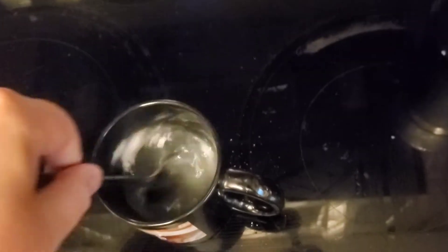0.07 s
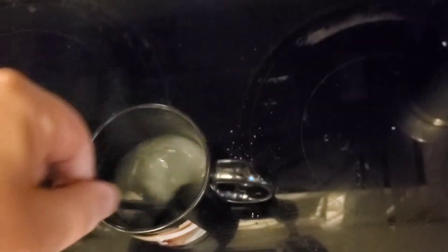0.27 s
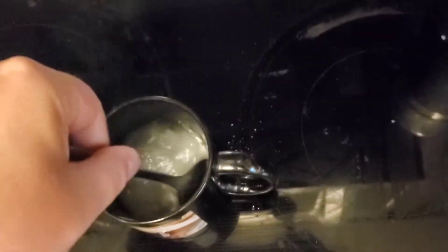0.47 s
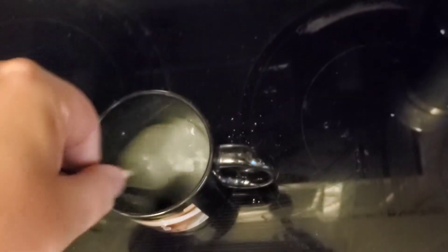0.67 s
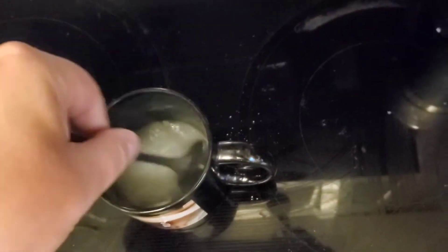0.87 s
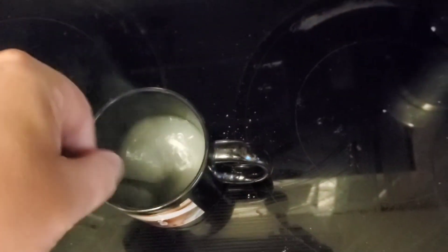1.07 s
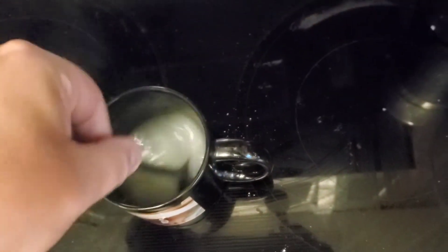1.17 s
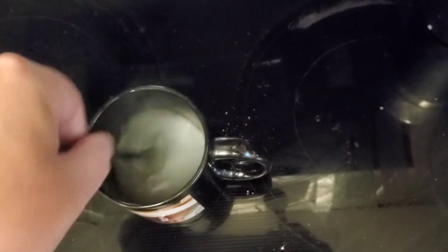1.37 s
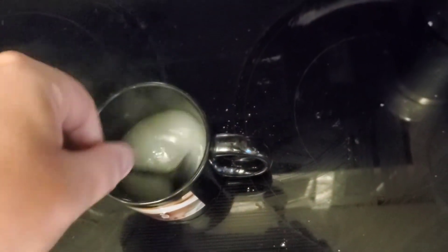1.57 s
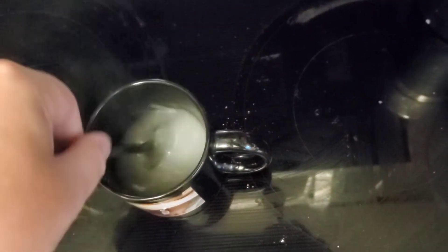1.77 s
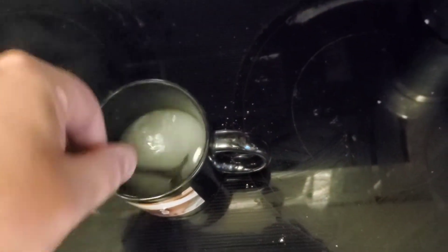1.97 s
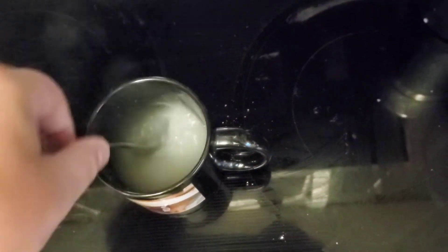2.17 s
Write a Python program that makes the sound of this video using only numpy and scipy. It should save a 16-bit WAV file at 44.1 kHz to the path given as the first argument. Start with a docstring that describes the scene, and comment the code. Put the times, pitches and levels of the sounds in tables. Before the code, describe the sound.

Close up in a small kitchen, a spoon stirs a drink in a mug on a glass hob. Each turn brings a short ringing clink and a duller knock, with light swishing and fizzing in between and quick echoes.

```python
"""A knock and a bright chink, then steady clinking: a metal spoon stirs powder into water in a mug.
On each turn, about two and a half a second, it hits the wall, which rings, then knocks low in
the mug, which shakes the glass hob below. Water swishes and fizzes between the blows.
A small kitchen answers the blows with quick echoes, over a faint rumble."""
import sys
import numpy as np
from scipy import signal
from scipy.fft import rfft, irfft, next_fast_len
from scipy.io import wavfile
from scipy.ndimage import map_coordinates

SR = 44100
rng = np.random.default_rng(int(sys.argv[2]) if len(sys.argv) > 2 else 0)


def unload_audio(sound):
    """Save the sound as a 16-bit wav file, at the path given as the first command line argument."""
    columns = np.transpose(np.atleast_2d(sound))
    # keep every value between -1 and 1, then stretch to whole-number steps
    steps = np.round(np.clip(columns, -1, 1) * 32767)
    wavfile.write(sys.argv[1], SR, steps.astype(np.int16))


N = 97284
T = np.arange(N) / SR
CONTACT_RISE_S, WAVERS_PER_S = .00049, 42.9


def from_db(db):
    return 10 ** (np.asarray(db) / 20)


def unit_rms(x):
    return x / np.sqrt(np.mean(x ** 2) + 1e-20)


def at_hz(points, hz):
    """Read a table between its frequencies."""
    freqs, values = np.transpose(points)
    return np.interp(np.log(hz + 1e-9), np.log(freqs), values)


def pan(db):
    """Left and right gains with the same total power."""
    gains = from_db(np.array([np.atleast_1d(db), -np.atleast_1d(db)]) / 2)
    return gains / np.sqrt(np.mean(gains ** 2, axis=0))


def fade(t60):
    """Die away by 60 dB in t60 seconds, the ring time."""
    return np.exp(-np.log(1000) * T / t60)


def rise(seconds):
    return 1 - np.exp(-T / seconds)


def add(out, start_s, x):
    i = max(int(start_s * SR), 0)
    out[:, i:] += x[..., :N - i]


def waver(t):
    """A random curve wandering by about 1 either way."""
    return map_coordinates(rng.standard_normal(200), [t * WAVERS_PER_S], order=1, mode="nearest")


# How alike left and right are: (frequency [Hz], likeness [0 to 1])
LIKENESS = [(130, .99), (300, .95), (600, .8), (1300, .4), (2500, .15), (6000, .1), (16000, 0)]
# How much louder the left is: (frequency [Hz], level [dB])
BALANCE = [(100, .8), (600, 1.2), (1400, -2.5), (2100, -6.8), (3200, -3), (4500, -1.2), (9000, -2.3),
           (14000, -4.8)]
def noise(spectrum, ripple_db=0, size=N):
    """Shaped stereo noise about size samples long; ripple adds random peaks and dips."""
    size = next_fast_len(size, True)
    hz = np.arange(size // 2 + 1) * SR / size
    mid, side = rfft(rng.standard_normal((2, size)))
    ripple = ripple_db * np.interp(hz / 130, np.arange(256), rng.standard_normal(256))
    alike = at_hz(LIKENESS, hz)
    stereo = np.sqrt(1 + alike) * mid + np.sqrt(1 - alike) * side * [[1], [-1]]
    shaped = stereo * from_db(at_hz(spectrum, hz) + ripple) * pan(at_hz(BALANCE, hz))
    x = unit_rms(irfft(shaped, size)[:, :N])
    return np.pad(x, [(0, 0), (0, N - x.shape[1])])


def ring(tones, size=26000, wobble_hz=16.2, scatter_db=3, flutter_db=2.5):
    """One blow starts fading tones; sloshing water makes them waver."""
    out, t = np.zeros((2, N)), T[:size]
    for k, (hz, db, t60) in enumerate(tones):
        apart = np.arccos(at_hz(LIKENESS, hz)) / 2 * (-1) ** k  # high tones reach the ears out of step
        slosh = waver(t)
        pitch = hz + wobble_hz * min(hz / MUG_HZ[0], 1) * slosh
        phase = rng.uniform(0, 2 * np.pi) + 2 * np.pi * np.cumsum(pitch) / SR
        level = db + scatter_db * rng.normal() + flutter_db * slosh * np.minimum(t * WAVERS_PER_S, 1)
        gain = from_db(level) * np.exp(-np.log(1000) * t / t60)
        out[:, :size] += gain * pan(at_hz(BALANCE, hz)) * np.sin(phase + apart * np.array([[1], [-1]]))
    return out


# Background noise: (frequency [Hz], relative level [dB])
RUMBLE = [(25, -59), (45, 9), (70, 4), (140, 3), (300, 3), (1000, -22), (4000, -44), (16000, -25)]
def rumble():
    """A faint, steady rumble with a little hiss."""
    return from_db(-58.5) * noise(RUMBLE)


# The room's lingering sound: (frequency [Hz], relative level [dB])
ROOM_TAIL = [(100, -2), (400, -2.5), (1500, -3), (3000, -3), (6000, 2.5), (10000, 9.5), (16000, 2.5)]
# Echoes off near surfaces: (delay [s], level [dB])
ECHOES = [(.0092, -16.5), (0.0196, -19)]
def kitchen(x, tail_db=-13.5, tail_delay_s=.012):
    """Two quick echoes and a short blurred tail whose treble dies first."""
    blur = noise(ROOM_TAIL)
    low = signal.sosfilt(signal.butter(1, 4000, fs=SR, output="sos"), blur)
    tail = low * fade(t60=.46) + (blur - low) * fade(t60=.12)
    out = x.copy()
    add(out, tail_delay_s, signal.fftconvolve(x, from_db(tail_db) * unit_rms(tail) / np.sqrt(N), axes=1))
    for delay_s, db in ECHOES:
        add(out, delay_s, from_db(db) * x)
    return out


# The scrape's hiss: (distance from its pitch [Hz], relative level [dB])
SCRAPE_BAND = [(20, 0), (180, -2), (450, -14), (1200, -32), (5000, -60)]
def scrape(lead_s=.075, width_s=.03, pitch_hz=4600, climb_hz_per_s=7000):
    """Before each clink the spoon slides along the wall: a faint, rising hiss."""
    glides = np.zeros(N)
    for clink_s, *_ in CLINKS:
        t = T - clink_s + lead_s
        swell = np.exp(-(t / width_s) ** 2)
        glides += swell * np.sin(2 * np.pi * (pitch_hz + climb_hz_per_s * t / 2) * t)
    return from_db(-70) * glides * noise(SCRAPE_BAND)


def fizz(pitches=18, bubbles_per_s=440, ring_cycles=7.3):
    """Small bubbles appear at random, each ringing for a few cycles."""
    out = np.zeros((2, N))
    for hz in np.geomspace(950, 2000, pitches):
        born = rng.random(N) < bubbles_per_s / pitches / SR
        clicks = born * from_db(10 * np.minimum(rng.exponential(1, N), 3))
        decay = np.exp(-np.log(1000) * hz / ring_cycles / SR)
        step = 2 * np.pi * hz / SR
        pings = signal.lfilter([0, np.sin(step)], [1, -2 * decay * np.cos(step), decay ** 2], clicks + 1e-18)
        out += pan(rng.normal(-1.3, 8.6)) * pings
    return unit_rms(out)


# The swish's noise: (distance from its pitch [Hz], relative level [dB])
SWISH_BAND = [(20, 0), (110, -2), (260, -14), (700, -34), (3000, -60)]
def swish(pitch_hz=1386, swing_hz=159.1, turns_per_s=2.4, highest_at_s=.93):
    """The hollow behind the spoon sings, gliding up and down once a turn."""
    hz = pitch_hz + swing_hz * np.cos(2 * np.pi * turns_per_s * (T - highest_at_s))
    band = noise(SWISH_BAND) * np.sin(2 * np.pi * np.cumsum(hz) / SR)
    return pan(at_hz(BALANCE, pitch_hz)) * unit_rms(band)


# How the water swells and sinks: (time [s], level [dB])
SWIRL = [(0, -39.5), (.3, -69), (.44, -45.5), (.56, -45), (.62, -44), (.77, -75), (.86, -39.5), (.95, -50),
         (1.04, -47.5), (1.16, -66), (1.3, -45.5), (1.41, -45), (1.58, -58), (1.72, -47), (1.84, -45.5),
         (1.98, -67), (2.2, -37.5)]
# The water's broad wash: (frequency [Hz], relative level [dB])
WASH = [(60, -19), (140, -15), (250, -21), (500, -7.5), (800, -14.5), (1150, -3.5), (1450, 3),
        (1900, -13.5), (3000, -7.5), (3900, -25), (4700, -7.5), (6500, -25), (9000, -24.5), (16000, -34)]
def water(plop_s=.524):
    """Water pushed by the spoon washes, swishes and fizzes; one larger bubble bursts."""
    bubbles = from_db(-9) * fizz()
    swell = from_db(np.interp(T, *np.transpose(SWIRL)) + .5 * waver(T))
    out = swell * (from_db(-2) * noise(WASH) + from_db(-6.5) * swish() + bubbles)
    plop = ring([(hz, -24.5, .035) for hz in (1167, 1350, 1600)])
    add(out, plop_s, plop * rise(CONTACT_RISE_S))
    return out


# The spoon dragging on the mug's bottom: (frequency [Hz], relative level [dB])
SCUFF = [(50, -15), (140, -0.5), (230, -9), (460, -1), (750, -14), (1500, -14), (5000, -47), (16000, -62)]
# Soft bumps: (time [s], boom level [dB], scuff level [dB])
BUMPS = [(.004, -22, -30.5), (.137, -25.5, -23), (0.196, -45, -28.5), (0.246, -36, -36.5),
         (0.297, -30, -37.5), (0.632, -35, -39), (0.723, -27.5, -44.5), (1.077, -32, -35.5),
         (1.112, -32, -40.5), (1.46, -32, -48), (1.517, -31.5, -37), (1.878, -32.5, -35.5),
         (1.923, -36, -43)]
def bumps(boom_hz=142.3, scatter_hz=6.9):
    """The mug bumps the hob with a boom; with each, the dragging spoon makes a soft, low scuff."""
    out = np.zeros((2, N))
    for start_s, boom_db, scuff_db in BUMPS:
        hz = boom_hz + scatter_hz * rng.normal()
        boom = from_db(boom_db) * np.sin(2 * np.pi * hz * T) * fade(t60=.19)
        scuff = from_db(scuff_db) * noise(SCUFF, size=12000) * fade(t60=.13)
        add(out, start_s, (boom + scuff) * rise(.0045))
    return out


# Crowds of brief tones in mug, metal and hob, each: (frequency [Hz], relative level [dB])
MUG_CLACK = [(100, -25.5), (700, -21.5), (1200, -4.5), (1700, -5.5), (2300, 1.5), (3200, 1), (4100, -8),
             (5200, -3), (7000, -22.5), (10000, -18.5), (16000, -35)]
METAL_TICK = [(2000, -115), (5000, -4), (7000, 12), (9000, 0.5), (10800, -2.5), (13000, 5), (15000, 7.5),
              (16000, -10.5)]
HOB_THUD = [(30, -51), (60, -29), (130, -7), (220, -9), (450, -3.5), (900, -5.5), (1400, -1), (2200, -2.5),
            (4000, -16), (10000, -39)]
def impact(clack_db, tick_db, thud_db):
    """The noisy part of a blow; each spot that is hit favours its own pitches."""
    snap = fade(t60=.021)  # the first instant of touch
    clack = noise(MUG_CLACK, ripple_db=3.5, size=12000) * (fade(t60=.12) + from_db(-4) * snap)
    tick = noise(METAL_TICK, ripple_db=6, size=12000) * (fade(t60=.21) + from_db(9) * snap)
    thud = noise(HOB_THUD, size=12000) * fade(t60=.15) * rise(.0036)
    return from_db(clack_db - 2) * clack + from_db(tick_db - 4) * tick + from_db(thud_db - 1.5) * thud


# The hob's tones, one list each: (pitch [Hz], relative level [dB], ring time [s])
HOB_HZ = (137, 178, 255, 329, 445, 487, 702, 811, 945, 1130, 1377, 1640)
HOB_DB = (-4.5, -14, -14.5, -8, -2, -7, -5, -10.5, -11, -8.5, -0.5, -9)
HOB_T60_S = (0.18, 0.32, 0.12, 0.13, .12, 0.17, 0.14, .13, 0.17, 0.033, 0.11, 0.082)
def hob():
    """The glass shakes under the mug."""
    return ring(zip(HOB_HZ, HOB_DB, HOB_T60_S)) * rise(.003)


# The spoon's tones, one list each: (pitch [Hz], relative level [dB], ring time [s])
SPOON_HZ = (3720, 4900, 5586, 7030, 8257, 8480, 9320, 11536, 12700, 14450)
SPOON_DB = (-12.5, -13, -10, -12, -9.5, -16.5, -10, -17, -17.5, -12)
SPOON_T60_S = (0.12, 0.17, 0.19, 0.13, 0.14, 0.1, 0.12, 0.095, 0.085, 0.032)
def spoon(scatter_hz=12.7):
    """The metal rings; grip and water shift its pitch from blow to blow."""
    return ring(zip(np.array(SPOON_HZ) + scatter_hz * rng.normal(), SPOON_DB, SPOON_T60_S))


# The mug's tones, one list each:
# (base pitch [Hz], relative level [dB], full ring time [s], share of the rim's pitch shift [0 to 1])
MUG_HZ = (2062, 2184, 2660, 3160, 3400, 4380, 4975, 5588, 5816, 6890, 8850, 9780, 12160, 13860)
MUG_DB = (3.5, -10, -12, -11.5, -17.5, -6, -13.5, -13, -11.5, -24.5, -13, -19.5, -33, -24)
MUG_T60_S = (0.16, 0.41, 0.037, 0.044, .3, 0.034, 0.12, 0.28, 0.18, 0.22, 0.09, 0.16, .09, 0.075)
MUG_SHIFT = (1, .4, .2, .2, 0, .1, .2, .2, .5, .2, .2, .4, .3, .3)
def mug(rim_hz, length=1):
    """The wall rings; water leaning on it shifts its tones, and the spoon's touch can shorten them."""
    shift = rim_hz / MUG_HZ[0] - 1
    pitches = np.array(MUG_HZ) * (1 + shift * np.array(MUG_SHIFT))
    return ring(zip(pitches, MUG_DB, length * np.array(MUG_T60_S)))


# Low blows, with relative levels: (time [s], mug [dB], spoon [dB], clack [dB], tick [dB], thud [dB])
KNOCKS = [(.0045, -36.5, -52, -22, -48, -30.5), (0.0581, -69, -42, -20, -36.5, -26.5),
          (.113, -47, -46, -34, -47, -37), (0.3446, -59, -18, -23, -27, -32.5),
          (0.3624, -32.5, -36, -18, -43, -21), (0.7964, -29.5, -18.5, -25.5, -23.5, -24.5),
          (1.1879, -29, -21.5, -28.5, -31, -41.5), (1.2202, -25.5, -54, -22, -46, -22),
          (1.621, -27.5, -22.5, -18.5, -30, -21), (2.0122, -25, -22, -29.5, -34.5, -48),
          (2.1050, -25, -26.5, -22, -38, -27.5), (2.1748, -18.5, -19, -16.5, -26.5, -21.5)]
def knocks():
    """Blows low in the mug ring both spoon and mug, and shake the hob."""
    out = np.zeros((2, N))
    for start_s, mug_db, spoon_db, clack_db, tick_db, thud_db in KNOCKS:
        tones = from_db(spoon_db) * spoon() + from_db(thud_db) * hob() + from_db(mug_db) * mug(MUG_HZ[0])
        add(out, start_s, (tones + impact(clack_db, tick_db, thud_db)) * rise(CONTACT_RISE_S))
    return out


# The tones of the spoon's tip: (pitch [Hz], relative level [dB], ring time [s])
TIP_TONES = [(3160, -1.5, 0.072), (3772, 7.5, 0.055), (3850, 1.5, 0.051), (4170, -0.5, 0.052),
             (4760, -6, 0.044)]
# Taps of the tip: (time [s], relative level [dB])
CHINKS = [(.0045, -20), (.013, -39), (.058, -28.5), (1.085, -31)]
# Blows on the wall, with relative levels: (time [s], rim pitch [Hz], mug [dB], clack [dB], tick [dB],
# bounce delay [s], bounce [dB], share of full ring time [0 to 1])
CLINKS = [(0.1361, 2102, -15, -12.5, -36.5, 0.0096, -3, 0.68),
          (0.6045, 2099, -9.5, -17, -30.5, .018, -5, 0.72), (1.0635, 2048, -11, -18, -25.5, 0.018, -7, 0.7),
          (1.4532, 2053, -11, -19, -30, .020, -4.5, 0.83), (1.8644, 2080, -11, -23, -29, 0.02, -6.5, 0.76)]
def clinks(thud_db=-34.5):
    """The spoon hits the wall and bounces once, more softly; its tip adds a few bright chinks."""
    out = np.zeros((2, N))
    attack = rise(CONTACT_RISE_S)
    for start_s, rim_hz, mug_db, clack_db, tick_db, delay_s, bounce_db, length in CLINKS:
        hit = from_db(mug_db) * mug(rim_hz, length) + impact(clack_db, tick_db, thud_db)
        bounce = from_db(mug_db) * mug(rim_hz, length) + from_db(-1.5) * impact(clack_db, tick_db, thud_db)
        add(out, start_s, hit * attack)
        add(out, start_s + delay_s, from_db(bounce_db) * bounce * attack)
    for start_s, db in CHINKS:
        add(out, start_s, from_db(db) * ring(TIP_TONES) * attack)
    return out


def scene():
    return kitchen(clinks() + knocks() + bumps()) + water() + scrape() + rumble()


def record(dry, cutoff_hz=15900):
    """Clip peaks at full scale and cut the highest treble."""
    return signal.sosfilt(signal.ellip(10, .1, 80, cutoff_hz, fs=SR, output="sos"), np.clip(dry, -1, 1))


dry = scene()
out = record(dry)
unload_audio(out)
```